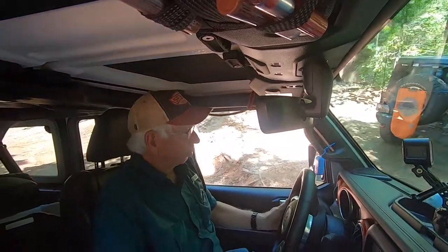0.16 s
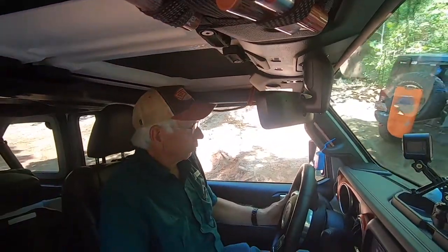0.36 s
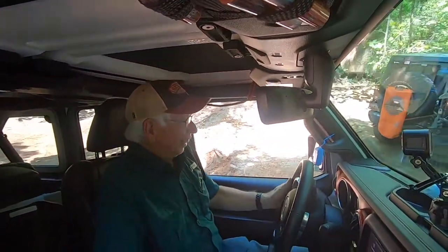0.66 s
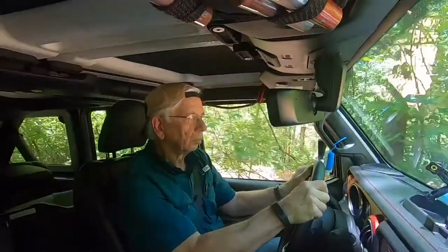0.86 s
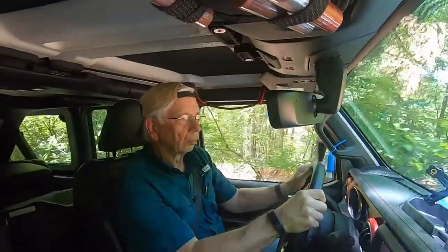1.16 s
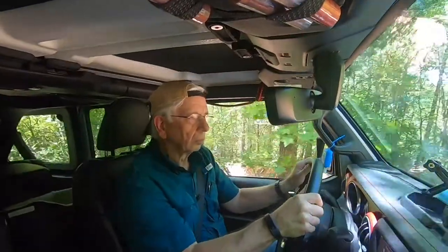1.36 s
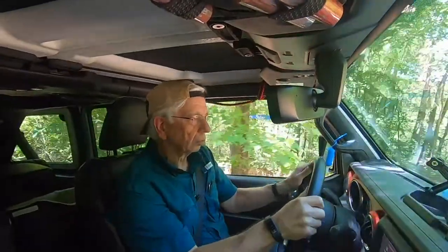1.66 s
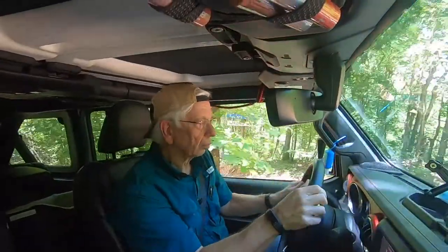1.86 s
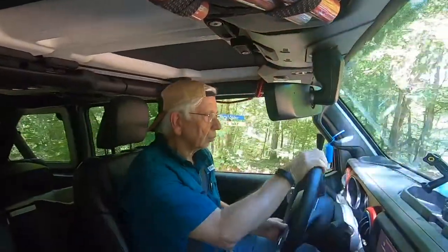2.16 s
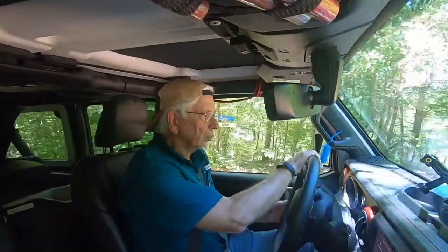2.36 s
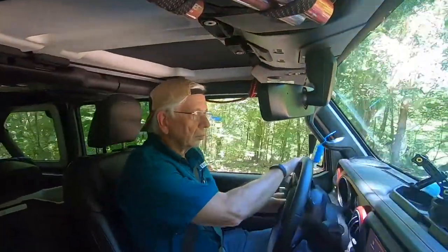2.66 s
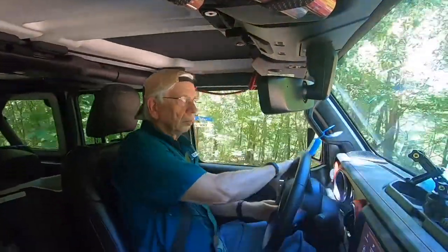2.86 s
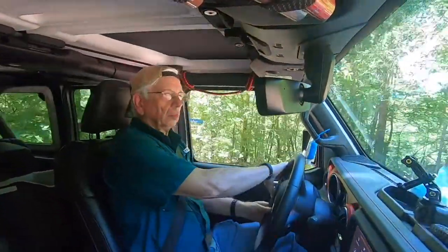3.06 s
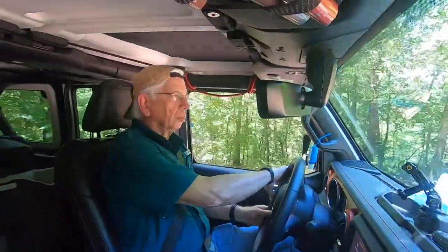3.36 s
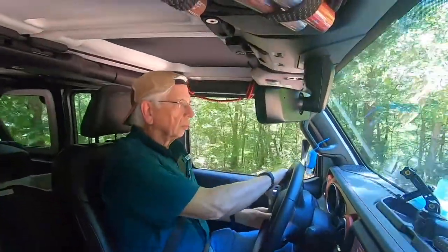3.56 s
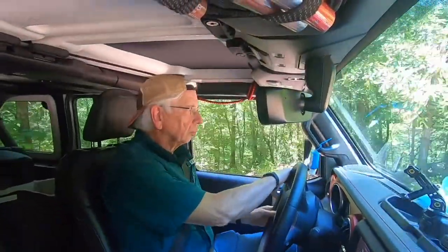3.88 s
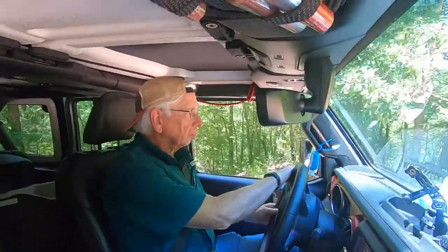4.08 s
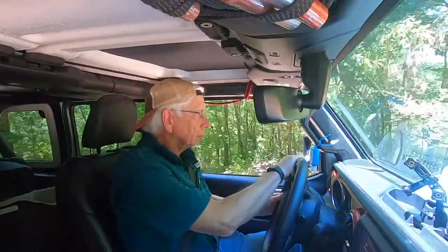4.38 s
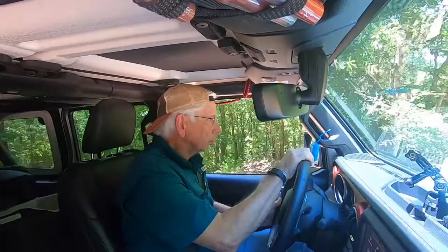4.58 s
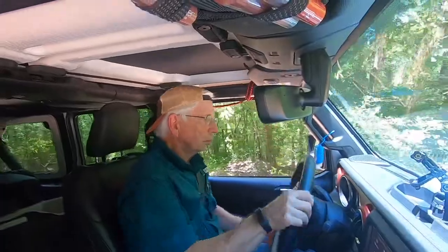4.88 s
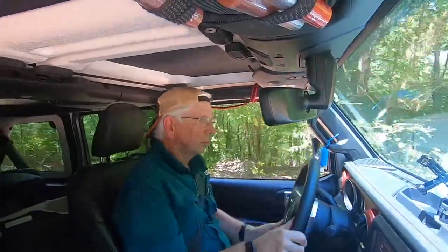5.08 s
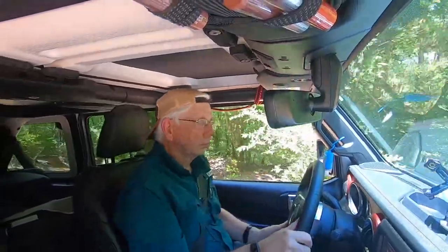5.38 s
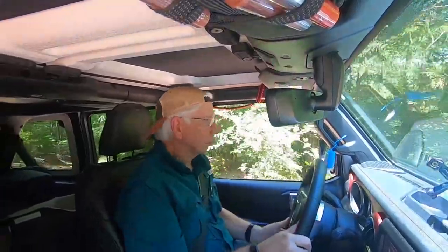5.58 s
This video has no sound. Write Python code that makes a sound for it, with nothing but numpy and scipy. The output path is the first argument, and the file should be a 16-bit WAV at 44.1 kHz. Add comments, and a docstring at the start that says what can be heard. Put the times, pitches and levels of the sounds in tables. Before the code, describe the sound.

Inside a vehicle cabin, a faint murmur and tiny ticks are broken almost at once by a loud, heavy slam with cracking clatter. It dies quickly, and rolling begins abruptly: deep uneven boom, muffled engine and tyre rumble, soft driveline hum and faint brush rustle. Light ticks and a cluster of knocks and rattles midway punctuate the crawl. The microphone sits inside, close to the fittings.

```python
"""Inside the cabin of an off-road vehicle. It stands with a faint noise murmur and a few ticks; from 0.3 s
something heavy slams against the body: blows ring decaying panel modes, with noise cracks and clatter, and one
blow clicks sharply. From 0.65 s it crawls along a dirt trail: the shell booms in two wavering sines, engine and
tyres rumble in filtered noise, the driveline hums in unsteady sines, and brush rustles in noise. Twigs and
loose fittings tick throughout, as short noise bursts through resonances."""
import sys
import numpy as np
from scipy import signal
from scipy.fft import rfft, irfft
from scipy.io import wavfile

SR = 44100
rng = np.random.default_rng(int(sys.argv[2]) if len(sys.argv) > 2 else 0)


def pcm_store(signal):
    """Save signal as 16-bit PCM."""
    levels = np.round(np.clip(np.atleast_2d(signal), -1, 1) * 32767)
    wavfile.write(sys.argv[1], SR, levels.astype(np.int16).T)


N = 252693

ROLL_S = 0.6524   # rolling sets in, standing murmur and clatter stop
SIDES = np.array([[.5], [-.5]])   # splits a left-right dB difference
# slam blows: start_s, level_db, middle_mode_knock_db, brightness_db
BLOWS = [(.313, -15.5, -2, -9), (0.318, -6, 3.5, -5.5), (0.324, -1, -0.5, -5.5), (0.328, -2.5, -5.5, -18.5),
         (.333, -6.5, -14, -20.5), (0.345, -5, -11, -12), (0.359, -8.5, -7, -13), (0.365, -6.5, 8.5, -17),
         (0.387, -15, 3, -13), (.398, -18.5, 5, -16), (0.417, -20, 4, -17), (0.444, -19.5, 8, -24),
         (0.471, -19, 4.5, -20), (0.499, -23.5, -8, -13.5), (0.509, -27, -7, -15)]
# treble spectrum of crack and clatter: freq_hz, relative_db_per_hz
CLATTER_TREBLE = [(710, -31.5), (1200, -10.5), (1690, -2.5), (1980, -16), (2650, -6), (4900, -15.5),
                  (7140, -19.5), (10100, -27), (14500, -55.5)]
# slam balance: freq_hz, left_minus_right_db
SLAM_LEAN = [(60, 5), (110, 0.5), (200, -1.5), (370, 0), (690, -0.5), (1270, 2), (2330, -1.5), (4290, 1),
             (7890, -1), (14500, 1)]


def from_db(db):
    """Amplitude ratio of a level in dB."""
    return 10 ** (np.asarray(db) / 20)


def rms_one(x):
    """Scale to rms 1."""
    return x / np.sqrt(np.mean(x ** 2) + 1e-20)


def in_time(rows):
    """Interpolate each column after the first (s) at every sample."""
    s, *columns = np.transpose(rows)
    return [np.interp(np.arange(N) / SR, s, c) for c in columns]


def at_hz(points, hz):
    """Interpolate a table over log frequency."""
    table_hz, values = np.array(points).T
    return np.interp(np.log(hz), np.log(table_hz), values)


def drift(rate_hz):
    """Slow chance: noise at every 40th sample through a double one-pole low-pass; spread 1."""
    r = np.exp(-80 * np.pi * rate_hz / SR)
    noise = rng.standard_normal(N // 40 + 2002)
    slow = signal.lfilter([1], [1, -2 * r, r * r], noise)[2000:]
    return np.interp(np.arange(N) / 40, np.arange(len(slow)), rms_one(slow))


def ring(clicks, hz, t60_s):
    """Two-pole resonator: a unit click sets off a decaying sine of starting height about 1."""
    r, w = from_db(-60 / (t60_s * SR)), 2 * np.pi * hz / SR
    return signal.lfilter([0, np.sin(w)], [1, -2 * r * np.cos(w), r * r], clicks + 1e-18)


def coloured(spectrum, size, lifts=(), lean=None, likeness=None):
    """Stereo noise of a given spectrum, balance and left-right likeness; rms 1."""
    # default balance: freq_hz, left_minus_right_db
    cabin_lean = [(60, -1), (180, -0.5), (540, 0), (1620, -3), (4840, -0.5), (14500, -1.5)]
    # default likeness, high in the bass: freq_hz, left_right_correlation
    cabin_likeness = [(60, 0.94), (110, 0.99), (200, 0.99), (370, 0.95), (690, 0.85), (1270, -0.064),
                      (2330, 0.59), (4290, 0.44), (7890, -0.13), (14500, -0.43)]
    lean = cabin_lean if lean is None else lean
    likeness = cabin_likeness if likeness is None else likeness

    hz = np.maximum(np.arange(size // 2 + 1) * SR / size, 1)
    outside = (hz < spectrum[0][0]) | (hz > spectrum[-1][0])
    level_db = at_hz(spectrum, hz) - 60 * outside
    for centre_hz, width_hz, lift_db in lifts:
        level_db = level_db + lift_db / (1 + (2 * (hz - centre_hz) / width_hz) ** 2)
    alike = np.clip(at_hz(likeness, hz), -1, 1)
    mid, side = rfft(rng.standard_normal((2, size)))
    both = np.sqrt(1 + alike) * mid + np.sqrt(1 - alike) * side * [[1], [-1]]
    return rms_one(irfft(both * from_db(level_db + at_hz(lean, hz) * SIDES), size))


def tone(rows, waver_hz, flutter_db):
    """A sine on its pitch and level curves, a little unsteady in both."""
    hz, level_db = in_time(rows)
    phase = 2 * np.pi * np.cumsum(hz + waver_hz * np.tanh(drift(6.81))) / SR
    level_db = level_db + flutter_db * np.clip(drift(2.8), -2, 1.5)
    return np.sqrt(2) * from_db(level_db) * np.sin(phase)


def rolling():
    """Boom, hums, rumble and rustle set in together over 16 ms."""
    onset = np.clip((np.arange(N) / SR - ROLL_S) / 0.016, 0, 1)
    return onset * (boom() + hums() + rumble_and_rustle())


def boom():
    """Two low modes of the shell, sines that swell with the ground."""
    # swells, before trim_db: start_s, lower_mode_db, upper_mode_db
    swells = [(0.66, -23, -19), (0.94, -27, -35.5), (1.01, -28, -29), (1.07, -16.5, -17.5),
              (1.14, -27.5, -35), (1.34, -25.5, -25.5), (1.45, -44, -19), (1.62, -36, -28),
              (1.68, -16.5, -29), (1.76, -28, -33), (2.04, -21.5, -24), (2.09, -16, -23), (2.19, -32, -26),
              (2.23, -20.5, -19.5), (2.38, -25, -36), (2.55, -25, -23), (2.62, -12, -42),
              (2.66, -11.5, -27), (2.81, -27, -20.5), (2.89, -20.5, -40), (2.96, -26, -29),
              (3.61, -21.5, -21), (3.67, -39, -26), (3.79, -16, -20), (3.82, -22.5, -47),
              (3.95, -24.5, -24), (4.2, -17, -28), (4.26, -18.5, -37), (4.29, -23, -22), (4.66, -23, -24),
              (4.8, -18.5, -30), (4.85, -32, -24), (4.97, -15.5, -20.5), (5.05, -41, -27.5),
              (5.21, -19, -24.5), (5.25, -15.5, -37), (5.33, -49, -28), (5.36, -33.5, -23.5),
              (5.64, -13.5, -33), (5.73, -26, -34.5)]
    # lower and upper mode: freq_hz
    shell_hz = [21.2, 37.32]
    trim_db = -0.5   # the rumble carries the rest of the boom
    out = 0
    for column, hz in enumerate(shell_hz, start=1):
        rows = [(row[0], hz, row[column] + trim_db) for row in swells]
        out = out + tone(rows, waver_hz=6.0, flutter_db=1.55)
    return out


def rumble_and_rustle():
    """Engine and tyre noise lifted by cabin resonances, and brush noise, lumpy from shared bumps."""
    # levels, rumble before rumble_gain_db: start_s, rumble_db, rustle_db
    roll = [(.66, -41, -58), (1.0, -41, -57.5), (1.6, -41, -56.5), (2.6, -41, -57.5), (2.85, -44.5, -60.5),
            (3.4, -42.5, -59.5), (4.3, -43.5, -60.5), (4.65, -44, -57.5), (5.0, -43.5, -60.5),
            (5.73, -43, -59.5)]
    # freq_hz, relative_db_per_hz
    rumble_colour = [(11, -12), (20, -2), (30, -1.5), (42, -5.5), (56, -8), (67, -15), (80, -15.5),
                     (100, -22), (150, -22.5), (192, -24), (270, -26), (313, -29.5), (351, -30),
                     (394, -31.5), (442, -29), (788, -38.5), (884, -38), (1810, -42.5), (5000, -64),
                     (6500, -100), (11000, -120)]
    # freq_hz, relative_db_per_hz
    rustle_colour = [(1470, -27), (2500, -5.5), (2790, -3), (3770, -11.5), (5370, -9), (8730, -11.5),
                     (10400, -20.5), (13700, -42), (14500, -46.5)]
    # cabin resonances: centre_hz, width_hz, lift_db
    cabin = [(79, 19, 4.5), (779.6, 95, 7.5), (1286, 11, 8), (1770, 190, 2), (2110, 250, -3),
             (2420, 23, 2.5), (3310, 370, 3.5), (2800, 180, 2.5)]
    rumble_gain_db = 18
    rumble_db, rustle_db = in_time(roll)
    bumps = drift(4.6)
    rumble_db = rumble_db + rumble_gain_db + 0.88 * bumps
    rustle_db = rustle_db + .5 * bumps + 0.68 * drift(25)
    rumble = from_db(rumble_db) * coloured(rumble_colour, N, cabin)
    rustle = from_db(rustle_db) * coloured(rustle_colour, N)
    return rumble + rustle


def hums():
    """Sines: a driveline hum that glides in pitch, and steadier hums that fade on either side of a spell."""
    # driveline hum: start_s, pitch_hz, level_db
    driveline = [(.66, 253, -41), (1.03, 252.4, -38.5), (1.15, 240, -49), (1.45, 248, -40),
                 (1.65, 236.1, -43), (1.95, 239, -40.5), (2.1, 228, -55), (2.6, 225.4, -44),
                 (3.0, 236, -53), (3.2, 243, -43), (3.45, 246.5, -44.5), (4.1, 248.8, -46), (4.5, 265, -52),
                 (4.75, 262.8, -54), (5.0, 257.3, -46), (5.25, 251.7, -43), (5.73, 247.2, -42)]
    # steadier hums: start_s, end_s, first_pitch_hz, last_pitch_hz, level_db, waver_hz, flutter_db
    spells = [(.66, 5.67, 288.5, 286, -44.5, 0.38, 0), (0.66, 2.47, 352.5, 353.5, -45.5, 0.5, 1.5),
              (3.09, 5.73, 353.5, 348, -47, 1.19, 2), (0.71, 1.45, 337, 340, -46.5, 1.6, 0.5),
              (2.11, 3.2, 65, 54, -38, 2, -2), (0.59, 0.86, 85, 84, -38, 1.7, 0),
              (4.0, 5.1, 64, 78, -39, 1.8, 2)]
    fade_db_per_s = 98.5
    out = tone(driveline, waver_hz=1.29, flutter_db=1.2)
    for start_s, end_s, first_hz, last_hz, level_db, waver_hz, flutter_db in spells:
        faint_db = level_db - fade_db_per_s
        rows = [(start_s - 1, first_hz, faint_db), (start_s, first_hz, level_db),
                (end_s, last_hz, level_db), (end_s + 1, last_hz, faint_db)]
        out = out + tone(rows, waver_hz, flutter_db)
    return out


def slam():
    """Struck panel, cracks and clatter, within the first second."""
    size = SR
    out = panel(size) + cracks(size) + clatter(size)
    return np.pad(out, ((0, 0), (0, N - size)))


def panel(size):
    """Every blow strikes the decaying panel modes with new strengths; bright blows drive the high modes."""
    # panel modes: freq_hz, level_db, t60_s
    modes = [(148.2, -1.5, 0.12), (179.6, -2, 0.1), (194, -14.5, 0.038), (243, 0.5, 0.11),
             (314, -6.5, 0.093), (357, -1.5, 0.069), (447, -14, 0.012), (536, -0.5, 0.048),
             (630, -10, 0.038), (1008, -16, 0.056), (1232, -24.5, 0.12), (1655, -25, 0.075),
             (1900, -20.5, 0.04), (2607, -21.5, 0.059), (2730, -19, 0.012), (3650, -20.5, 0.017)]
    # difference between the sides: freq_hz, side_minus_mid_db
    panel_apart = [(60, -30), (110, -28), (200, -27.5), (370, -17.5), (690, -9), (1270, 1), (2330, -2.5),
                   (4290, -8), (7890, 0), (14500, -2)]
    middle_hz, high_hz = 400, 700   # middle modes lie between
    bass_cut_hz, contact_cut_hz = 123, 5000
    s, peak_db, knock_db, bright_db = np.transpose(BLOWS)
    at = np.round(s * SR).astype(int)
    out = np.zeros((2, size))
    for hz, mode_db, t60_s in modes:
        clicks = np.zeros((2, size))
        apart = from_db(at_hz(panel_apart, hz)) * rng.choice([-1, 1], len(at)) * [[1], [-1]]
        high = np.clip(np.log2(hz / high_hz), 0, 1)
        level_db = peak_db + mode_db - 13.0 + high * (bright_db + 21.0)
        level_db = level_db + knock_db * (middle_hz < hz < high_hz)
        spread_db = rng.normal(0, 1.13, len(at)) + at_hz(SLAM_LEAN, hz) * SIDES
        # below high_hz every blow pushes the same way
        sign = 1 if hz < high_hz else rng.choice([-1, 1], len(at))
        clicks[:, at] = from_db(level_db + spread_db) * sign * (1 + apart)
        out += ring(clicks, hz, t60_s)
    # a small panel radiates no deep bass
    out = signal.sosfilt(signal.butter(4, bass_cut_hz, "high", fs=SR, output="sos"), out)
    # padded contact dulls the treble
    return signal.sosfilt(signal.butter(2, contact_cut_hz, fs=SR, output="sos"), out)


def cracks(size):
    """Each blow sets off treble noise that decays exponentially."""
    t60_s = 0.022
    s, peak_db, _, bright_db = np.transpose(BLOWS)
    envelope = np.zeros(size)
    envelope[np.round(s * SR).astype(int)] = from_db(peak_db + bright_db - 33.5)
    envelope = signal.lfilter([1], [1, -from_db(-60 / (t60_s * SR))], envelope)
    return envelope * coloured(CLATTER_TREBLE, size, lean=SLAM_LEAN)


def clatter(size):
    """Grainy body and treble noise that creeps in, leaps at the first blows and dies away."""
    # start_s, body_db, treble_db
    levels = [(.238, -71, -68), (.304, -48, -37.5), (.314, -24, -29), (.32, -11, -24.5), (.328, -21, -28),
              (.345, -23, -36.5), (.362, -22, -31), (.415, -22, -38.5), (.445, -32.5, -48),
              (.46, -38, -44.5), (.472, -36, -49), (.488, -36, -55), (.505, -36.5, -56), (.525, -50, -64.5),
              (.545, -56.5, -77), (.57, -66.5, -93), (.6, -78.5, -100)]
    # freq_hz, relative_db_per_hz
    body_colour = [(24, -59.5), (40, -27.5), (92, -48), (134, -19), (183, -3), (406, -15.5), (605, -14),
                   (1150, -22.5), (1710, -24.5), (2500, -34.5), (3250, -65), (5500, -120)]
    # freq_hz, left_right_correlation
    slam_likeness = [(60, 1), (200, 1), (370, 0.86), (690, 0.34), (1270, .2), (2330, 0.53), (4290, .4),
                     (7890, 0), (14500, 0.13)]
    body_db, treble_db = [c[:size] for c in in_time(levels)]
    sample = np.arange(size)
    sounding = (sample > levels[0][0] * SR) & (sample < ROLL_S * SR)
    lumps_db, grains_db = 1.4 * drift(40)[:size], 1.4 * drift(250)[:size]
    rattle = from_db(lumps_db + grains_db) * sounding
    body = coloured(body_colour, size, lean=SLAM_LEAN, likeness=slam_likeness)
    treble = coloured(CLATTER_TREBLE, size, lean=SLAM_LEAN, likeness=slam_likeness)
    return rattle * (from_db(body_db) * body + from_db(treble_db) * treble)


def ticks():
    """Twigs and fittings, and a sharp click at one slam blow: a touch and a scrape of band noise die fast and
    ring in the fittings."""
    # before the fittings ring: start_s, level_db, centre_hz, width_octaves, t60_s
    touches = [(.084, -53, 965, .3, 0.093), (.085, -56, 1560, .15, .05), (.112, -61, 8300, 0.4, 0.075),
               (.158, -63, 8150, .2, 0.057), (.167, -60, 1240, .3, 0.05), (0.239, -46.5, 5500, 1.3, 0.065),
               (0.243, -45, 6500, 0.4, 0.17), (.267, -41, 2500, 0.66, 0.13), (0.417, -33, 3500, 2.3, 0.015),
               (.468, -47, 5500, 1.3, 0.082), (0.499, -43, 4500, 1.7, 0.05),
               (0.509, -45.5, 5500, 1.4, 0.055), (0.92, -46, 3160, 0.61, 0.056),
               (1.296, -56, 4940, 0.96, 0.046), (1.389, -51, 2500, 1.6, .04), (1.48, -51, 7460, 1.2, 0.17),
               (1.719, -49, 2980, 1.0, .04), (1.788, -53, 7300, .67, .062), (1.915, -48, 7500, 1.7, 0.28),
               (1.96, -52.5, 7590, .6, 0.29), (2.508, -53, 5750, .12, 0.2), (2.51, -46.5, 3400, 1.0, 0.22),
               (2.52, -48.5, 7060, 1.3, 0.25), (3.275, -42, 1480, 0.51, 0.03),
               (3.302, -45.5, 3600, 0.88, 0.088), (3.302, -41, 2300, .9, .06), (3.306, -36, 1400, 1.5, .07),
               (3.314, -38, 1500, 1.4, 0.066), (3.318, -38, 870, 0.41, 0.065),
               (3.321, -48, 3200, 0.89, .07), (3.341, -50, 2800, 0.17, 0.034),
               (3.306, -47, 7600, 0.8, 0.16), (3.328, -51, 8200, .08, .16), (3.358, -47.5, 7500, 0.8, 0.1),
               (3.356, -47, 2980, .2, 0.09), (3.43, -35.5, 800, 1.1, 0.084), (3.44, -48, 1750, .3, .05),
               (3.439, -46, 2800, 1.4, 0.059), (3.468, -50.5, 1850, 0.15, .04),
               (3.951, -45.5, 1990, 1.63, .04), (4.381, -50, 6900, .4, 0.02), (4.552, -54, 4000, .8, .04),
               (4.568, -51, 4900, 0.12, 0.04), (4.569, -50, 4250, .2, .04), (4.569, -49, 4200, .9, .04),
               (4.568, -51.5, 8100, 0.33, 0.033), (4.571, -50, 2650, 0.19, 0.036),
               (4.586, -58, 4300, .8, .03), (4.7, -56, 4000, .3, 0.067), (4.72, -57, 4500, .8, 0.034),
               (4.778, -55, 3600, .6, .03), (4.802, -48, 3140, .25, .035), (4.802, -41, 1400, .25, 0.05),
               (4.956, -53, 2900, .3, .05), (4.958, -55, 6640, .25, 0.066), (5.386, -48.5, 3520, 0.6, 0.03),
               (5.648, -57, 5000, .6, 0.029)]
    # fitting resonances: freq_hz, width_hz
    fittings = [(800, 140), (1410, 270), (1830, 91), (2500, 120), (2930, 130), (3450, 160), (4250, 140),
                (5000, 85), (6050, 180), (8100, 91)]
    fitting_db, spread_db, treble_cut_hz = -7.0, 1, 10000
    snap = 12   # height of the first touch against the unit noise of the scrape
    size = 8192
    out, t = np.zeros((2, N + size)), np.arange(size) / SR
    for s, level_db, hz, octaves, t60_s in touches:
        edge = 2 ** (octaves / 2)
        band = signal.butter(2, [hz / edge, hz * edge], "band", fs=SR, output="sos")
        touch = rng.standard_normal((2, size))
        touch[0, 24] += snap
        mid, side = signal.sosfilt(band, touch)
        burst = mid + .6 * side * [[1], [-1]]
        rise_s = 0.00062 + .5 * t60_s ** 2   # long scrapes swell
        shape = from_db(level_db - 60 * t / t60_s) * np.minimum(t / rise_s, 1)
        lean = from_db(rng.normal(0, spread_db) * SIDES)
        at = round(s * SR)
        out[:, at:at + size] += rms_one(burst * shape) * np.sqrt(np.mean(shape ** 2)) * lean
    out = out[:, :N] + 1e-18
    rung = sum(signal.lfilter(*signal.iirpeak(hz, hz / width_hz, SR), out) for hz, width_hz in fittings)
    out = out + from_db(fitting_db) * rung
    # a steep low-pass takes off the highest treble of the ticks
    return signal.sosfilt(signal.butter(4, treble_cut_hz, fs=SR, output="sos"), out)


def standing():
    """Faint murmur of the cabin at rest: coloured noise on a level curve."""
    # start_s, level_db
    still = [(0, -66), (.08, -68), (.1, -59.5), (.22, -66), (.55, -56), (.6, -82.5), (.65, -73.5)]
    # freq_hz, relative_db_per_hz
    still_colour = [(15, -35.5), (25, -5.5), (158, -15.5), (245, -6.5), (592, -15), (939, -28), (1600, -25),
                    (2220, -34), (3000, -31), (3900, -41), (6600, -120)]
    level_db, = in_time(still)
    return from_db(level_db) * coloured(still_colour, N) * (np.arange(N) < ROLL_S * SR)


def scene():
    """Sum of all sources."""
    return rolling() + slam() + ticks() + standing()


def record(dry):
    """The loudest peaks are rounded; the top is cut."""
    ceiling, cutoff_hz = .9, 15100
    rounded = dry / (1 + (np.abs(dry) / ceiling) ** 4) ** .25
    return signal.sosfilt(signal.cheby2(12, 70, cutoff_hz, fs=SR, output="sos"), rounded)


dry = scene()
out = record(dry)
pcm_store(out)
```